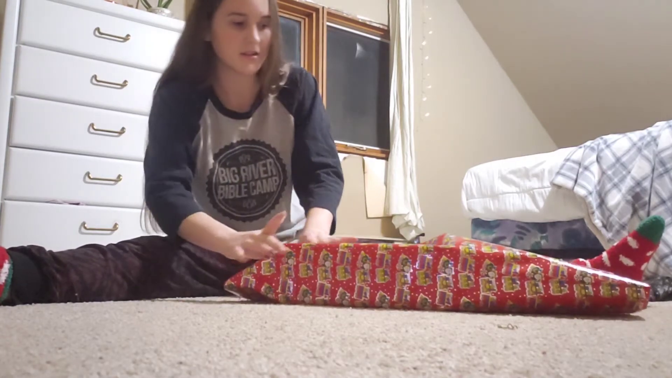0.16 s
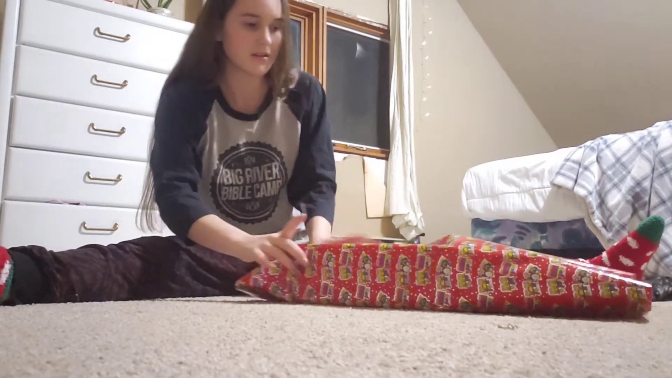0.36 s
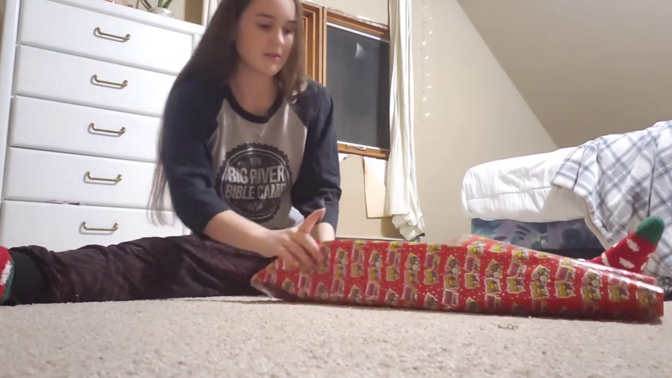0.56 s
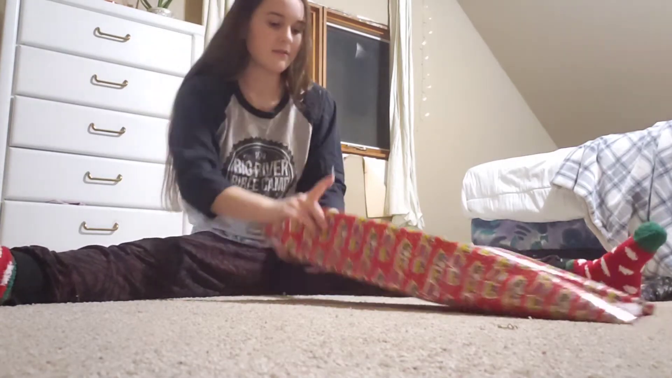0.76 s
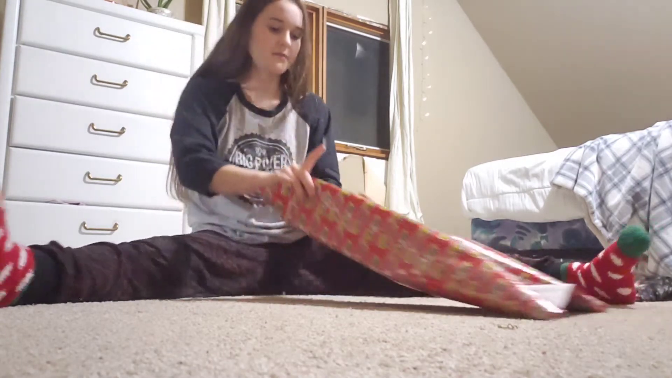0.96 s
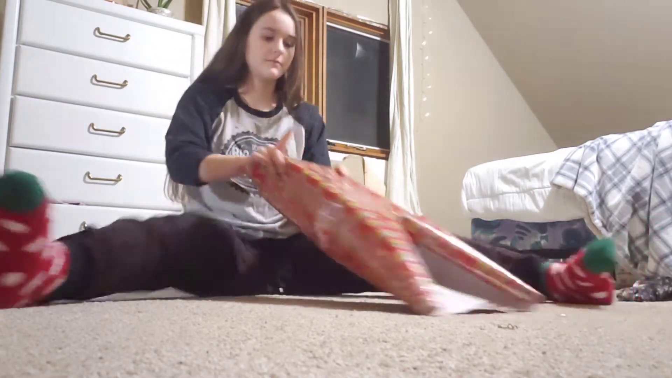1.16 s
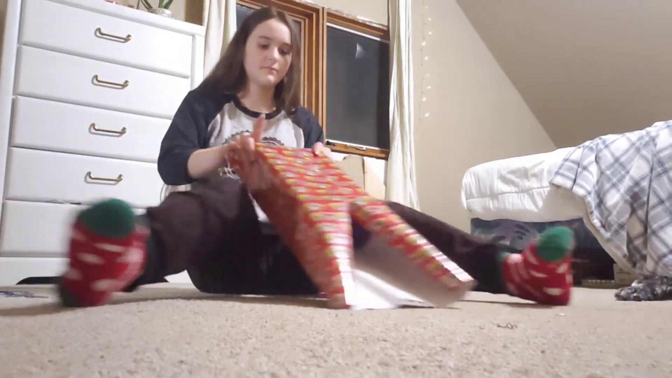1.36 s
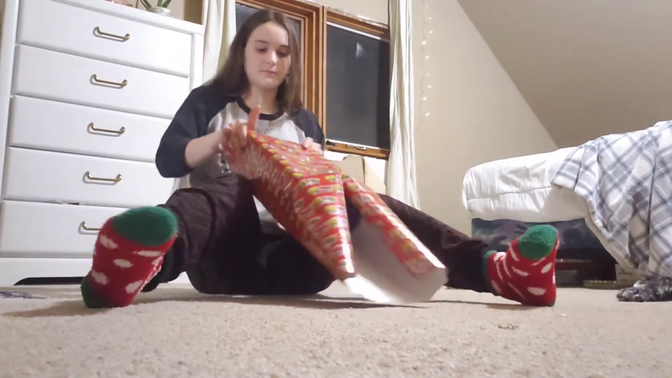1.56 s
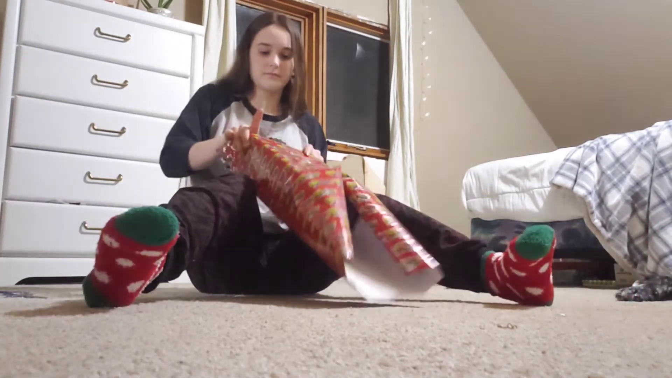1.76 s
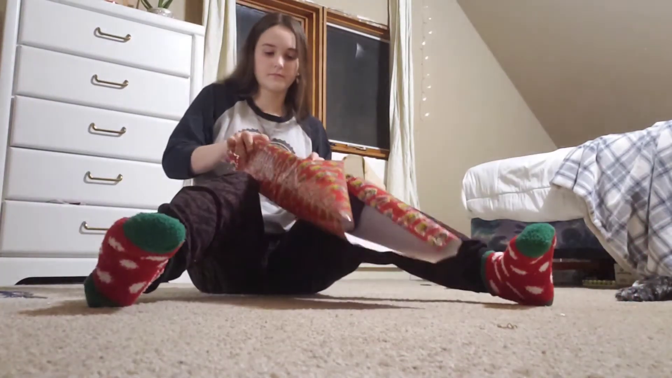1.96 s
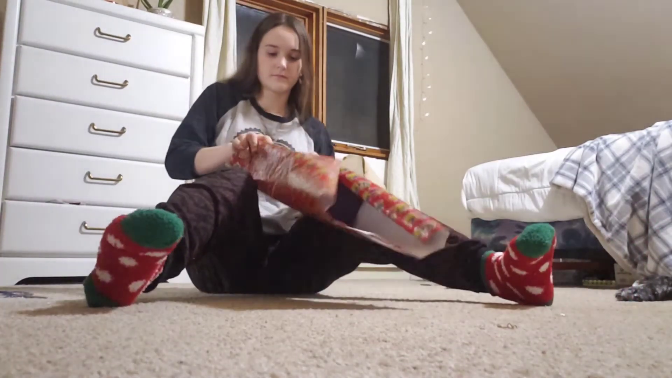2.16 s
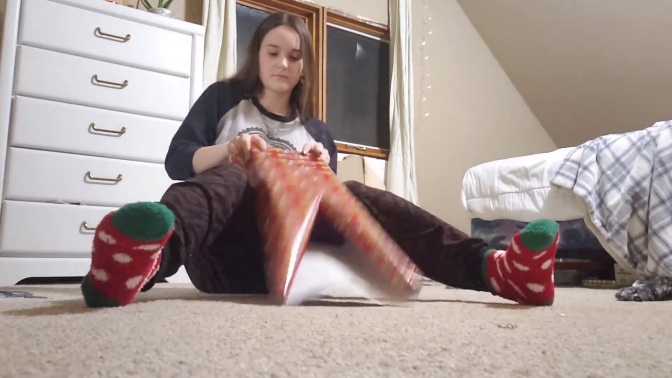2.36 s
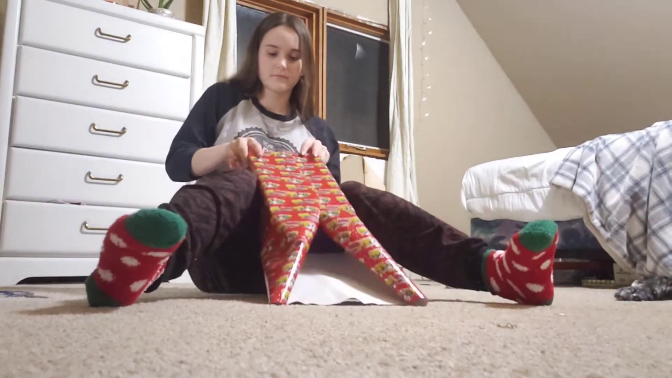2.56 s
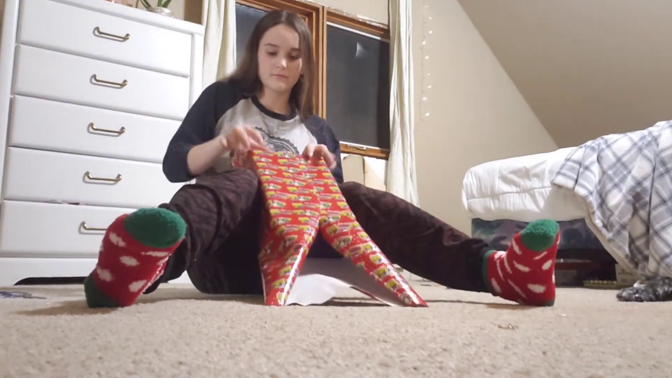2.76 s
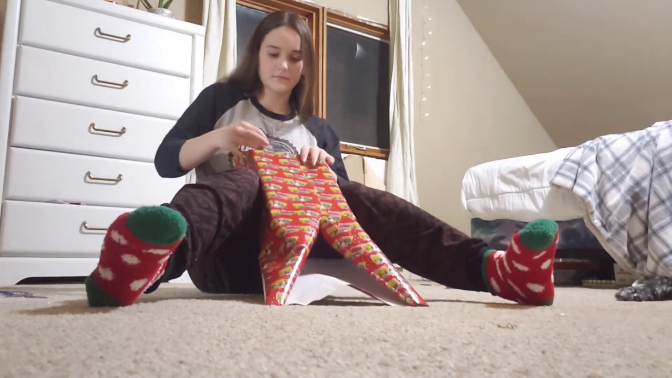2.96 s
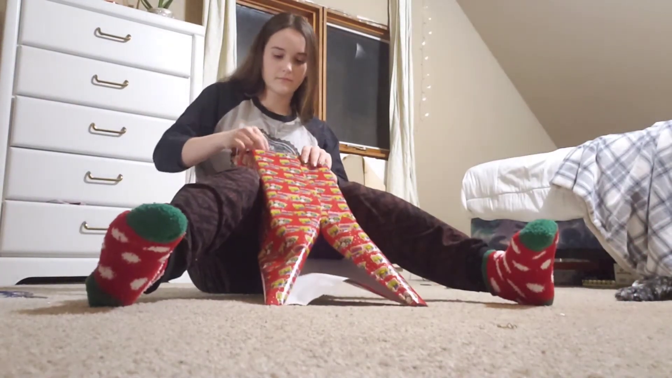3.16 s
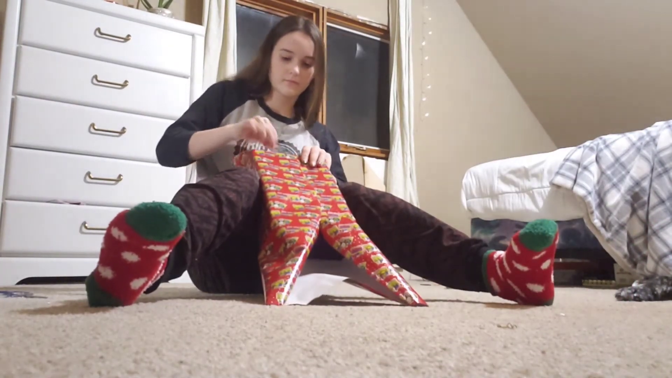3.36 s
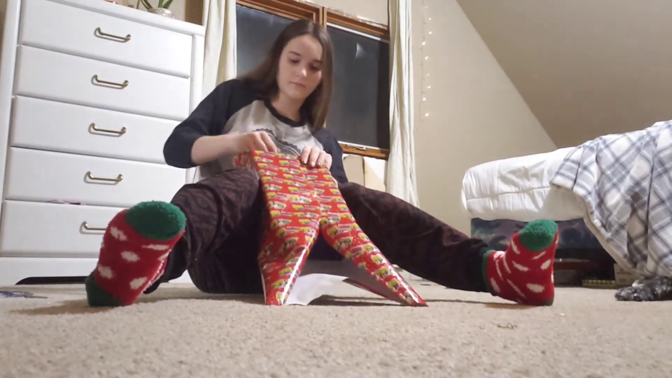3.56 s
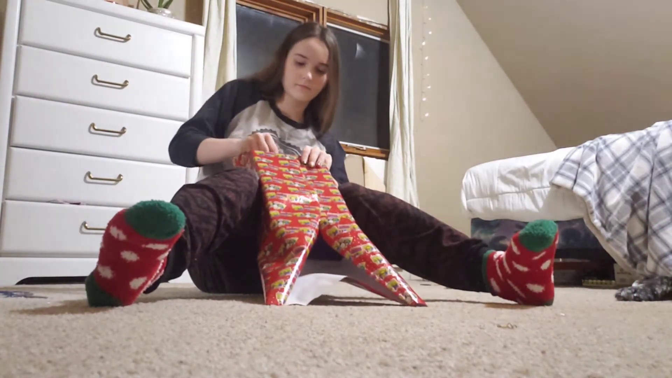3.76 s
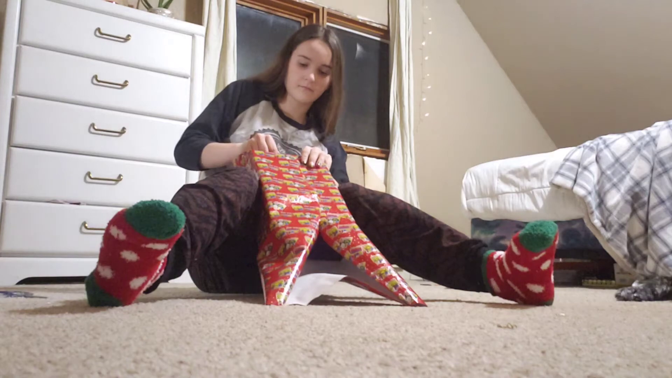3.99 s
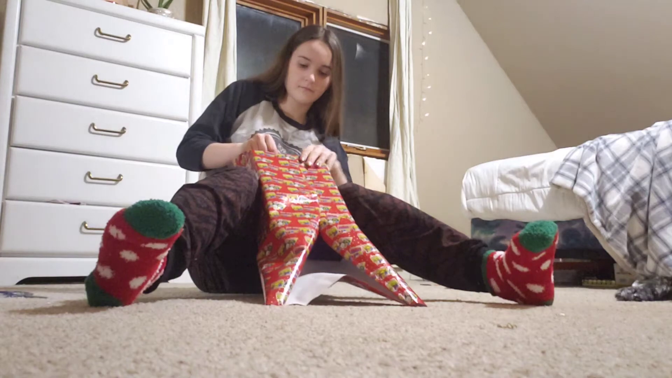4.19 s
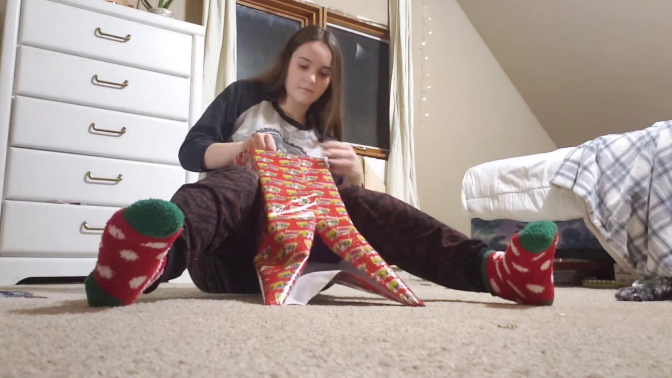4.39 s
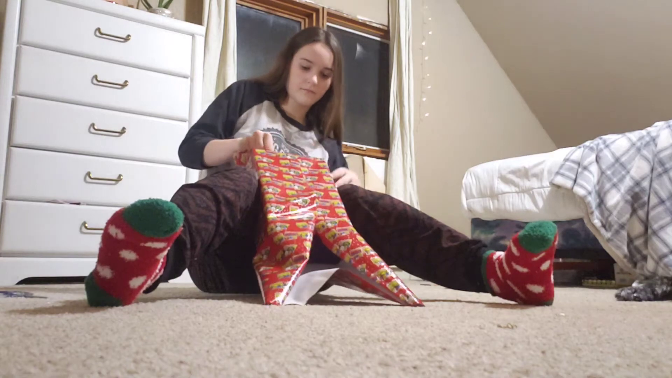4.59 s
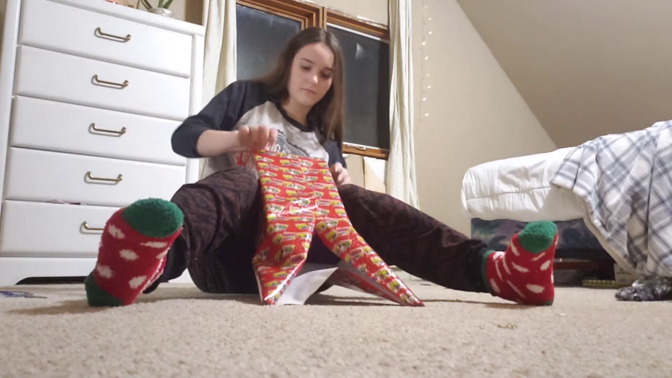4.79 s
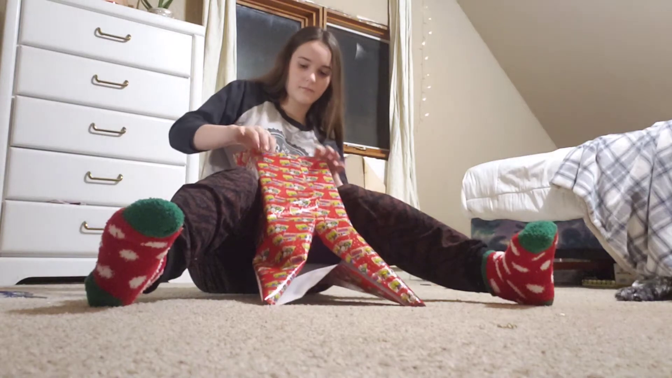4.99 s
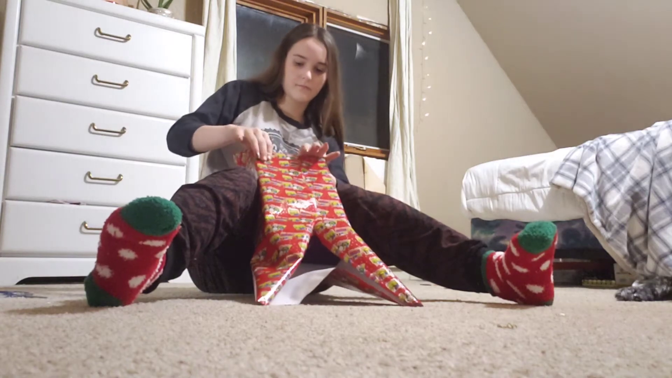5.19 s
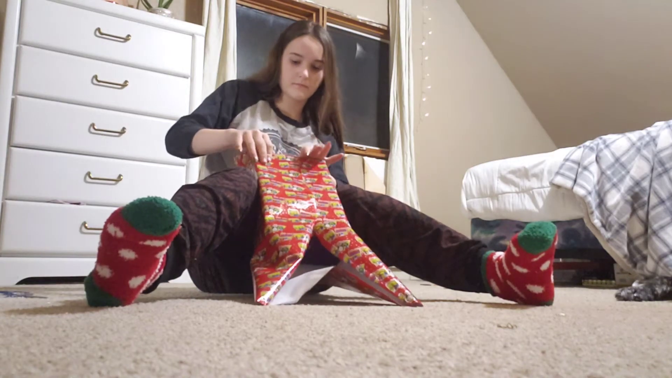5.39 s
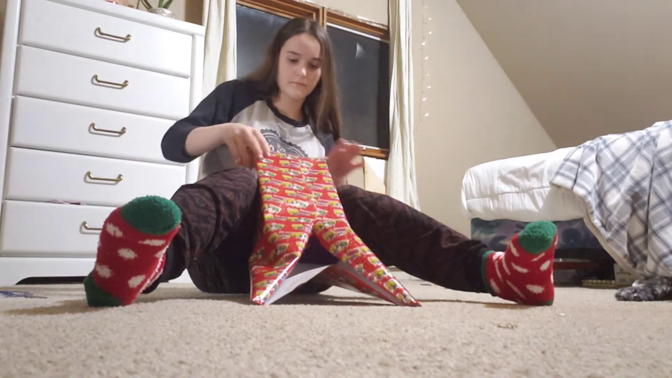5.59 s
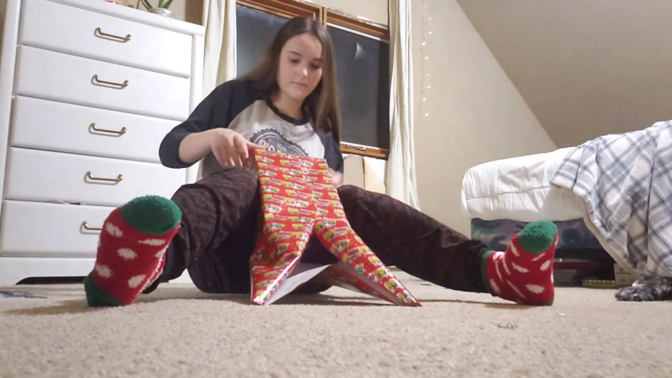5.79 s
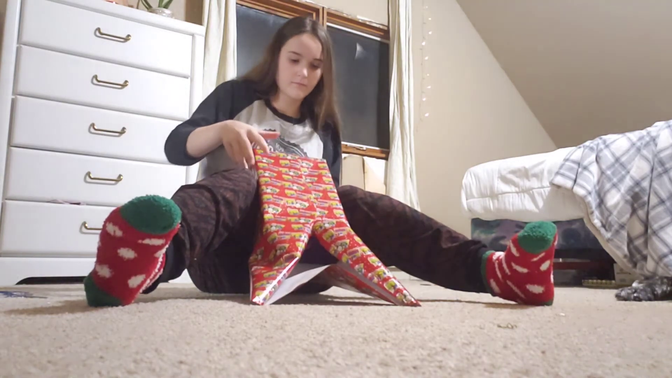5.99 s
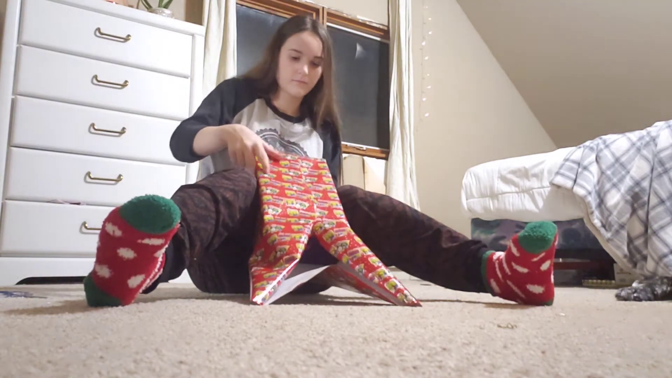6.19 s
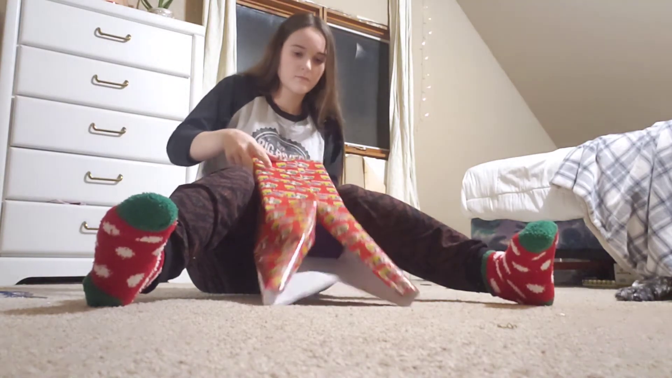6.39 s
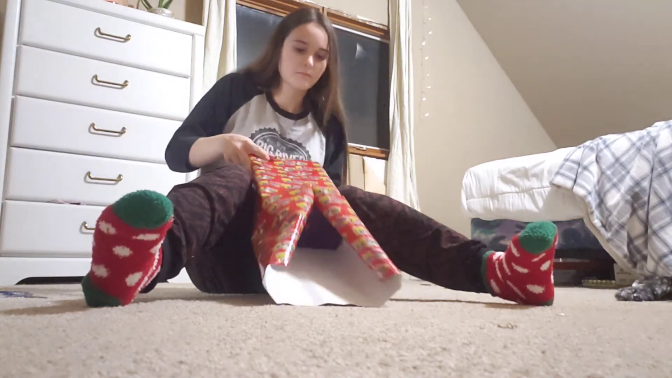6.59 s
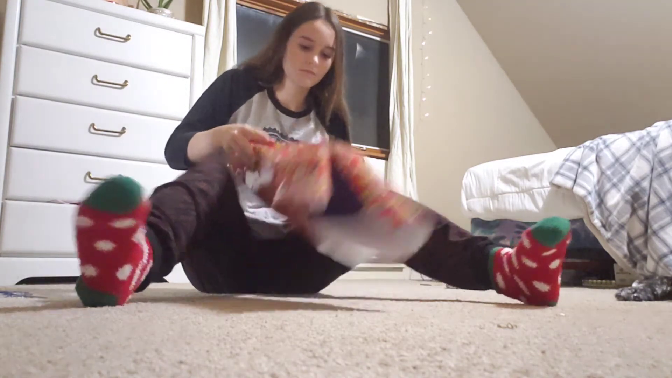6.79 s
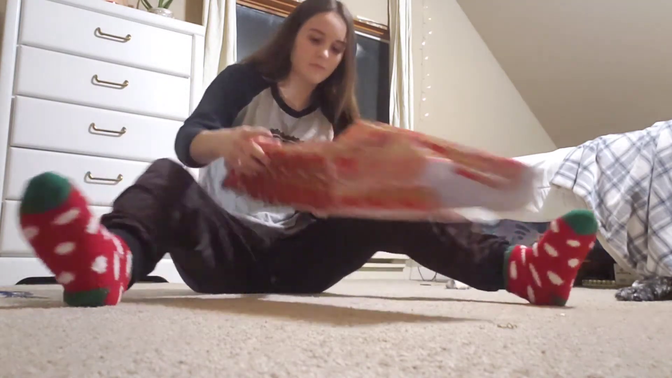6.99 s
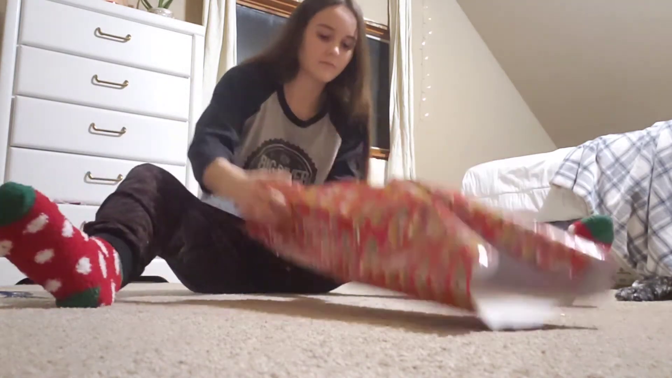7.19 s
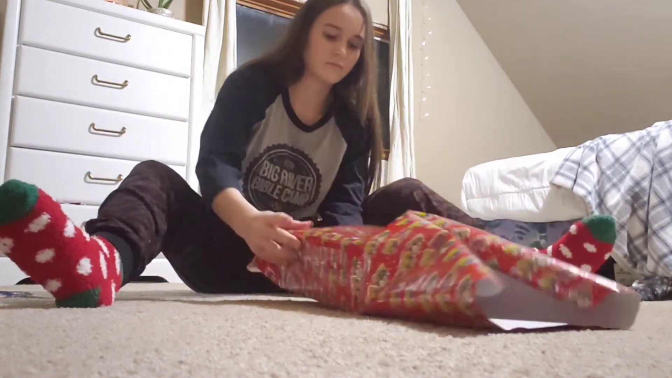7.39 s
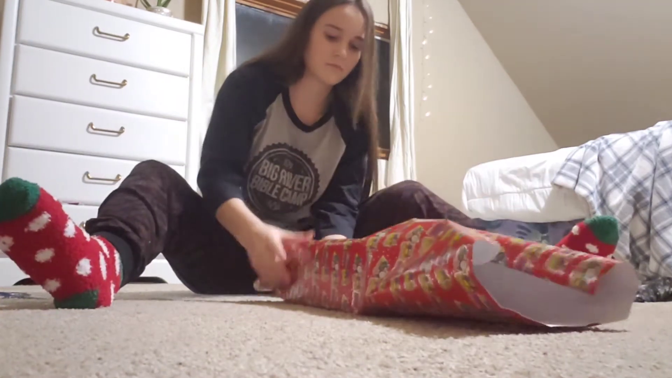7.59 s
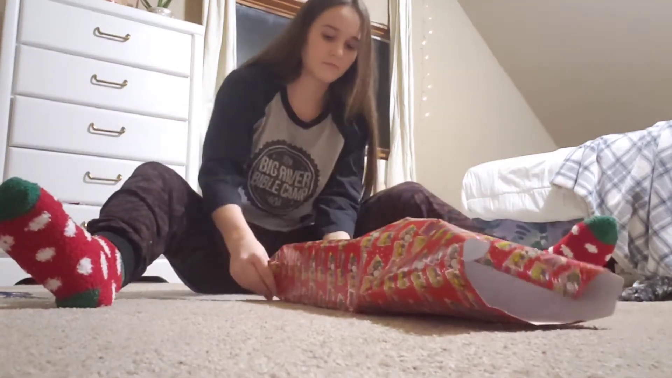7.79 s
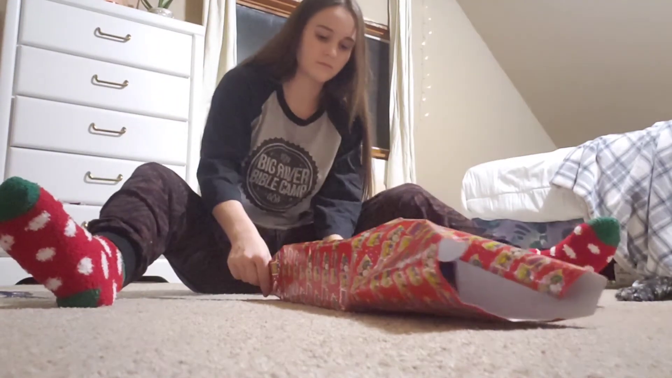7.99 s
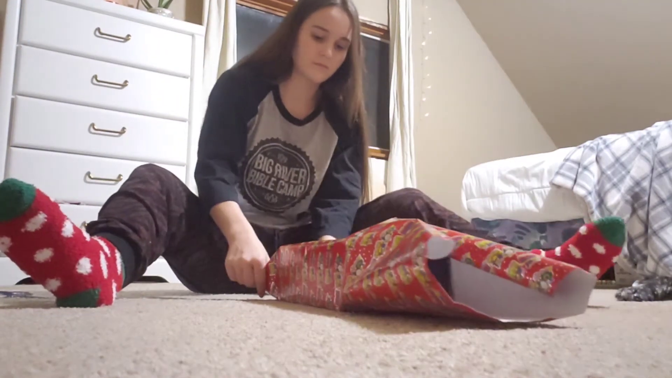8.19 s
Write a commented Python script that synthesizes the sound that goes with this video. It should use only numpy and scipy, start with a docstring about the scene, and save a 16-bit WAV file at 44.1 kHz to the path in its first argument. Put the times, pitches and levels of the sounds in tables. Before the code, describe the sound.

A small, softly furnished room, heard in close stereo with short echo and very faint air noise and hum. Paper slides lightly at first, with a snap around 0.4 s and a soft bump and flex at 0.5 s. Rustling thickens; a bright, hard crease cracks at about 1.15 s with a low cushioned knock. Until 2.6 s the sheet crackles busily, with dull hollow pops near 1.5 and 1.85 s and crisp snaps at 1.8 and 2.5 s. It thins to scattered creases around 3 s and almost stops after 3.5 s. Small ticks and brief soft rustles come between 4.3 and 5.7 s, then another near-silence. From 6.2 s movement returns, with a soft bump at 6.5 s, louder crumpling from 7 s and the heaviest low thump at 7.3 s. Papery pops and a sharp snap at 7.85 s follow, rustling to the end.

```python
"""A long box half covered in wrapping paper is lifted, folded at one end and laid back on a bedroom carpet.
From the start the paper slides and flexes: noise hiss and random clicks ringing through paper patches.
Single creases soon snap, soft low noise bumps mark box against legs and floor, then wide panels pop dully.
The handling thins out from about 3.5 s and grows strong again after 6 s, with the loudest bump near 7.3 s.
Air noise and mains hum lie under it all; two microphone ports hear the paper through a small room's echo."""
import sys
import numpy as np
from scipy import signal
from scipy.fft import rfft, irfft, next_fast_len
from scipy.io import wavfile
from scipy.ndimage import uniform_filter1d, map_coordinates

SR = 44100
rng = np.random.default_rng(int(sys.argv[2]) if len(sys.argv) > 2 else 0)


def store_wav(level_fs):
    """Save 16-bit WAV to argv[1]."""
    pcm = np.round(np.clip(np.atleast_2d(level_fs), -1, 1) * 32767)
    wavfile.write(sys.argv[1], SR, pcm.T.astype(np.int16))


N = 363825
T = np.arange(N) / SR
RING = T[:int(.3 * SR)]  # time axis of every single ring [s]
TOP_HZ = 16000  # band limit


def amp(db):
    """Decibels to gain."""
    return 10 ** (np.asarray(db) / 20)


def power_db(power):
    """Power to decibels."""
    return 10 * np.log10(power)


def unit(x):
    """x at rms 1."""
    return x / np.sqrt(np.mean(np.square(x)))


def along(points, hz, axis=1):
    """One column of (frequency [Hz], ..) points, read on a log frequency axis."""
    table = np.transpose(points)
    return np.interp(np.log(hz + 1), np.log(table[0]), table[axis])


def coloured(x, gain_db):
    """x through the causal minimum-phase filter whose gain is gain_db(Hz)."""
    size = 2 * next_fast_len(x.shape[-1] // 2 + 4096)
    log_gain = np.log(amp(gain_db(np.fft.rfftfreq(size, 1 / SR))))
    # folding the cepstrum onto positive time makes the filter causal
    cepstrum = irfft(log_gain)
    cepstrum[1:size // 2] *= 2
    cepstrum[size // 2 + 1:] = 0
    response = np.exp(rfft(cepstrum))
    return irfft(rfft(x, size) * response)[..., :x.shape[-1]]


def voiced(x, spectrum):
    """White x given a spectrum whose mean power up to TOP_HZ is 1."""
    power = np.mean(amp(along(spectrum, np.linspace(0, TOP_HZ, len(RING)))) ** 2)
    return coloured(x, lambda hz: along(spectrum, hz) - power_db(power))


# Faint air noise of the room: (frequency [Hz], relative level [dB])
AIR_SPECTRUM = [(124, 2), (3740, -20), (8640, -23), (15800, -12)]
HUM_HZ = 120


def quiet_room():
    """Faint air noise, independent in mid and side, over a steady sine of mains hum."""
    air = amp(-74.5) * voiced(rng.standard_normal((2, N)), AIR_SPECTRUM)
    hum = amp(-82.5) * np.sin(2 * np.pi * HUM_HZ * T)
    return air + hum


# Decay of the small room: (frequency [Hz], time to fall 60 dB [s])
ROOM_DECAY = [(4000, 0.23), (15000, 0.14)]
WALL_S, EARLY_DB = .024, -3.5  # nearby furniture answers first, more weakly; then the far walls


def room_tail():
    """A fresh mid/side reverberation of energy 1 that swells when the far walls answer."""
    hz, t, cells = signal.stft(rng.standard_normal((2, len(RING))), SR)
    decay = amp(-60 * t / along(ROOM_DECAY, hz)[:, None])
    tail = signal.istft(cells * decay, SR)[1][:, :len(RING)]
    swelling = np.where(RING < WALL_S, amp(EARLY_DB) * tail, tail)
    return unit(swelling) / np.sqrt(len(RING))


def patch(colour, t60, crack_db, room_db, ripple_db):
    """One patch of paper answers a click with a crack and a short ring at its own resonances; the room follows."""
    ringing = amp(-60 * RING / t60)
    crack = amp(crack_db - 60 * RING / .004)  # gone within milliseconds
    fade = (ringing + crack) * (1 - np.exp(-RING / .0003))
    ring = unit(rng.standard_normal((2, len(RING))) * fade) / np.sqrt(len(RING))
    heard = (ring + amp(room_db) * room_tail()) / np.sqrt(1 + amp(2 * room_db))
    # random ripple over the colour gives each patch its own resonances
    modes_hz = np.geomspace(30, TOP_HZ, num=110)
    modes_db = colour(modes_hz) + ripple_db * rng.standard_normal(len(modes_hz))
    return voiced(heard, np.column_stack([modes_hz, modes_db]))


def crumple(level_db, spectrum, rate, scatter_db, t60, room_db, ripple_db, growth=.24, count=170):
    """Random buckles, denser as well as louder under effort, that wander from patch to patch."""
    busy = rate * amp(growth * (level_db - level_db.max()))  # clicks per second
    clicks = (rng.random(N) < busy / SR) * amp(scatter_db * rng.standard_normal(N))
    # the hands feed in energy steadily; the buckles share it out unevenly
    power = np.abs(uniform_filter1d(uniform_filter1d(clicks ** 2, size=2200), size=900))
    clicks = clicks / np.sqrt(power + 1e-9) * amp(level_db)
    # neighbouring patches overlap in time
    place = np.floor(np.arange(N) * (count - 2) / N + 2 * rng.random(N))
    out = np.zeros((2, N + SR))
    for k in range(count):
        first, last = np.flatnonzero(place == k)[[0, -1]]
        ring = patch(lambda hz: along(spectrum, hz), t60, crack_db=3, room_db=room_db, ripple_db=ripple_db)
        own_clicks = clicks[first:last] * (place[first:last] == k)
        heard = signal.fftconvolve(own_clicks[None], ring, axes=1)
        out[:, first:first + heard.shape[1]] += heard
    return out[:, :N]


def stroke(start, end, rise, fall):
    """Power of one movement: full from start to end, with flanks in dB per second."""
    outside_db = rise * np.maximum(start - T, 0) + fall * np.maximum(T - end, 0)
    return amp(-2 * np.minimum(outside_db, 100))


def strokes_power(start, end, db, crisp_db, rise, fall):
    """One movement shared out as power of (broad bending, fine creasing)."""
    return amp([[db], [db + crisp_db]]) ** 2 * stroke(start, end, rise, fall)


# Paper sliding and shifting on box, legs and carpet:
# (start [s], end [s], broad bending level [dB], crispness: fine creasing against bending [dB])
PAPER_SLIDES = [(0, 0.142, -59, -4.5), (0.128, 0.434, -57, 3), (0.459, 1.276, -50, -1.5),
                (1.34, 1.709, -47, 1.5), (1.847, 2.125, -50.5, -3.5), (2.247, 2.62, -50.5, -4.5),
                (2.634, 3.336, -58.5, -9.5), (3.494, 3.642, -77, -1), (3.73, 3.882, -81, 1),
                (4.1, 4.273, -74, 2.5), (4.274, 4.816, -59.5, -3.5), (4.814, 4.928, -66.5, -11),
                (4.967, 4.975, -72, 13.5), (5.101, 5.195, -52, -3), (5.217, 5.33, -76, 8),
                (5.362, 5.672, -57, -3.5), (6.201, 7.016, -54.5, -6.5), (7.015, 8.007, -50, -3.5)]
SLIDE_RISE_DB_PER_S, SLIDE_STOP_DB_PER_S = 521.5, 366
CATCH_DB, CATCHES_PER_S = 1, 18  # sliding paper catches and lets go
# Hands bending the sheet and letting it relax:
# (time at full strength [s], hold [s], broad bending level [dB], crispness as above [dB])
HAND_FLEXES = [(0.14, 0.014, -48.5, -12), (0.508, 0.0042, -36.5, -13), (0.756, 0.037, -38.5, -9),
               (1.147, 0.014, -36, -3.5), (1.226, 0.0022, -37.5, -7.5), (1.47, 0.044, -34.5, -16.5),
               (1.542, 0.11, -41.5, -20.5), (1.754, 0.029, -37, -13), (2.088, 0.0051, -46, 1),
               (2.446, 0.035, -36.5, 0.5), (2.697, 0.105, -46.5, -6), (2.921, 0.044, -54, 4.5),
               (3.012, 0.01, -45.5, -6.5), (3.129, 0.02, -47.5, -2), (3.18, 0.02, -43, -6),
               (3.73, 0.031, -67, -8), (4.07, 0.061, -69, -2), (4.287, 0.11, -60.5, 3),
               (4.443, 0.1, -59, 3), (4.66, 0.017, -59.5, 9), (4.73, 0.013, -48.5, -2.5),
               (5.375, 0.075, -51.5, -2), (5.593, 0.044, -56.5, -2), (6.129, 0.11, -59.5, -22.5),
               (6.237, 0.0138, -56, 5), (6.354, 0.079, -48, 1), (6.433, 0.01, -42, -4),
               (6.508, 0.052, -41.5, -21), (6.664, 0.11, -44, -5), (7.066, .055, -43.5, -19),
               (7.148, 0.0137, -41.5, -6.5), (7.329, 0.011, -30, -9), (7.511, 0.015, -42, -1.5),
               (7.626, 0.067, -41.5, -2.5), (7.771, 0.087, -41.5, 1), (8.162, 0.085, -48.5, 0.5)]
FLEX_RISE_DB_PER_S, FLEX_RELAX_DB_PER_S = 654, 192


def handling():
    """Power of the flexes and of the slides, each as (broad bending, fine creasing)."""
    knots = rng.standard_normal(int(CATCHES_PER_S * T[-1]) + 4)
    catching = amp(2 * CATCH_DB * map_coordinates(knots, [T * CATCHES_PER_S]))
    sliding = sum(strokes_power(start, end, db, crisp_db, SLIDE_RISE_DB_PER_S, SLIDE_STOP_DB_PER_S)
                  for start, end, db, crisp_db in PAPER_SLIDES)
    flexing = sum(strokes_power(s, s + hold_s, db, crisp_db, FLEX_RISE_DB_PER_S, FLEX_RELAX_DB_PER_S)
                  for s, hold_s, db, crisp_db in HAND_FLEXES)
    return flexing, sliding * catching


# Bending sheet: (frequency [Hz], relative level [dB])
BENDING_SPECTRUM = [(30, -31), (70, -7.5), (160, -2.5), (350, -3), (460, 3.5), (600, -2), (800, -4),
                    (1300, -12.5), (2000, -16), (8000, -41.5)]
# Fine creases and sliding hiss: (frequency [Hz], relative level [dB])
CREASE_SPECTRUM = [(300, -5.5), (1000, 12.5), (1800, 4), (3000, 7.5), (5500, 5.5), (8200, -0.5),
                   (10500, 0.5), (12700, 7.5), (15800, 7.5)]
# Reach of dullness in a flipping flap: (frequency [Hz], share of the dullness [0-1])
FLAP_SHARE = [(1200, 1), (3500, .6), (7000, .35), (12000, 0)]
CRACKLE_DULL_DB = 4  # creases that flip have more body than paper that slides
# gains on the fine creasing: flexes mostly crackle (at 0 dB), slides crackle and hiss alike
SLIDE_CRACKLE_DB, SLIDE_HISS_DB, FLEX_HISS_DB = -5, -5, -6


def sheet():
    """Wide areas buckle dully, fine creases crackle, and moving paper hisses."""
    (flex_broad, flex_fine), (slide_broad, slide_fine) = handling()
    bend_db = power_db(flex_broad + slide_broad)
    crease_db = power_db(flex_fine + amp(SLIDE_CRACKLE_DB) ** 2 * slide_fine)
    hiss_db = power_db(amp(FLEX_HISS_DB) ** 2 * flex_fine + amp(SLIDE_HISS_DB) ** 2 * slide_fine)
    buckling = crumple(bend_db, BENDING_SPECTRUM, rate=600, scatter_db=3.5, t60=.029, room_db=-10, ripple_db=2.5)
    folds = [(hz, db + CRACKLE_DULL_DB * along(FLAP_SHARE, hz)) for hz, db in CREASE_SPECTRUM]
    crackle = crumple(crease_db, folds, rate=480, scatter_db=6.5, t60=.022, room_db=-5, ripple_db=3.6)
    hiss = voiced(amp(hiss_db) * rng.standard_normal((2, N)), CREASE_SPECTRUM)
    return buckling + crackle + hiss


def add_flip(out, s, db, ring):
    """One flip of the paper added to out: any few random warning ticks, then the full ring."""
    before = T[:SR // 80][::-1]  # time left until the flip [s]
    ticks = (rng.random(len(before)) < 900 / SR) * amp(-20) * np.exp(-before / .005)
    ticks[-1] = 1
    levelled = ring / np.sqrt(np.mean(ring[:, :SR // 200] ** 2))  # first 5 ms at rms 1
    flip = signal.fftconvolve(ticks[None], levelled, axes=1)
    start = round(s * SR) - len(before)
    out[:, start:start + flip.shape[1]] += amp(db) * flip


# Creases that snap through: (time [s], level of the ring's first 5 ms [dB], dullness [dB])
CREASE_SNAPS = [(0.2472, -43, 5.5), (0.4296, -34.5, -1.5), (0.5478, -34.5, -19.5), (0.6162, -42.5, 3),
                (0.9792, -36, -5), (1.0364, -40, 9.5), (1.1587, -27.5, 0), (1.1613, -20, -7.5),
                (1.4303, -45.5, 7.5), (1.5942, -35, 0.5), (1.6023, -29.5, 2.5), (1.7662, -38, 7.5),
                (1.8054, -25, -2), (2.0263, -41, 3.5), (2.1148, -28, -19), (2.4513, -27, 4),
                (2.475, -36.5, 11), (2.5136, -30.5, 14), (2.526, -39, 12), (2.7872, -34.5, 4),
                (2.8825, -35.5, -2), (3.0213, -38.5, -10), (3.1933, -28, -14), (3.251, -36, 2.5),
                (3.459, -38, -26.5), (4.0473, -61.5, -6.5), (4.3305, -48, -0.5), (4.5114, -43, 8),
                (4.657, -46, 3), (4.7424, -40.5, -2), (4.9384, -56, -5.5), (5.079, -51.5, 1),
                (5.3241, -58, -13.5), (5.3584, -53, 3.5), (5.5952, -40, -11.5), (6.3618, -41.5, 8),
                (6.435, -39.5, -4), (6.6727, -37.5, 3), (6.907, -46.5, 24), (7.0294, -43.5, -1),
                (7.134, -30.5, -0.5), (7.2233, -36.5, 4), (7.4306, -36.5, -10), (7.5225, -36, 2),
                (7.541, -36, 8.5), (7.7857, -34, 2), (7.8414, -30, -14.5), (7.8457, -23.5, -5),
                (7.947, -41.5, 1), (8.1037, -32.5, -2.5), (8.1682, -43.5, -4.5), (8.178, -40, -6)]
# A sharp snap: (frequency [Hz], relative level [dB])
SNAP_SPECTRUM = [(150, -3.5), (500, 8), (1700, 4.5), (3500, -1.5), (6000, 2.5), (8500, -6.5), (13000, 1),
                 (15800, 5.5)]


def snaps():
    """Single creases flip over, the duller the larger the flap."""
    out = np.zeros((2, N + SR))
    for s, db, dull_db in CREASE_SNAPS:
        colour = lambda hz: along(SNAP_SPECTRUM, hz) + dull_db * along(FLAP_SHARE, hz)
        add_flip(out, s, db, patch(colour, t60=.024, crack_db=2, room_db=-4, ripple_db=4.2))
    return out[:, :N]


# Soft bumps of the box and the air it pushes:
# (time [s], peak level [dB], centre frequency [Hz], time to fall 60 dB [s])
BOX_BUMPS = [(0.507, -40, 169, 0.13), (1.157, -35.5, 236, 0.1), (1.236, -46.5, 73, 0.91),
             (3.457, -54, 180, 0.14), (4.42, -49.5, 180, 0.22), (6.518, -32.5, 204, 0.14),
             (7.329, -28, 189, 0.17), (7.329, -31.5, 58, 0.3)]


def bumps(rise_s=0.0013, skirt_db=12):
    """The hollow box meets cloth and carpet: a soft push into a broad low resonance."""
    out = np.zeros((2, N + SR))
    for s, db, centre_hz, t60 in BOX_BUMPS:
        swell = amp(-60 * RING / t60) * (1 - np.exp(-RING / rise_s))
        push = rng.standard_normal((2, len(RING))) * swell
        # skirts steepen with the square of the distance in octaves
        boom = coloured(push, lambda hz: -skirt_db * np.minimum(np.log2((hz + 1) / centre_hz) ** 2, 6))
        start = round(s * SR)
        out[:, start:start + len(RING)] += amp(db) * boom / np.abs(boom).max(axis=1, keepdims=True)
    return out[:, :N]


# Wide panels that buckle with a hollow note:
# (time [s], level of the ring's first 5 ms [dB], resonance [Hz])
PANEL_POPS = [(1.4901, -32.5, 630), (1.8454, -29, 630), (1.9264, -35, 593), (2.245, -45, 840),
              (2.71, -42.5, 645), (3.19, -39, 511), (5.074, -51.5, 546), (5.862, -68.5, 513),
              (6.045, -62.5, 600), (6.105, -62, 500), (7.6299, -37.5, 726), (7.7231, -31.5, 663),
              (7.735, -35, 1550), (7.886, -42.5, 1430), (7.978, -39.5, 1410)]
POP_SKIRT_DB_PER_OCTAVE = 10.5


def pops():
    """Wide panels buckle, each ringing briefly around one resonance."""
    out = np.zeros((2, N + SR))
    for s, db, centre_hz in PANEL_POPS:
        colour = lambda hz: -POP_SKIRT_DB_PER_OCTAVE * np.abs(np.log2(hz / centre_hz))
        add_flip(out, s, db, patch(colour, t60=.024, crack_db=0, room_db=-11, ripple_db=2))
    return out[:, :N]


# The two microphone ports: (frequency [Hz], side gain against mid [dB], left against right [dB])
PORT_BALANCE = [(96, -17, -2.5), (330, -8.5, 1.5), (792, -1, -5.5), (1530, -2.5, 6.5), (7160, 1, 4),
                (8300, -2, -8), (15440, 0, -6)]


def scene():
    """Paper, box and room at two ports: alike in the bass, shaded differently by the body that holds them."""
    mid, side = quiet_room() + sheet() + snaps() + bumps() + pops()
    side = coloured(side, lambda hz: along(PORT_BALANCE, hz))
    shade = lambda hz: along(PORT_BALANCE, hz, axis=2) / 2
    left = coloured(mid + side, shade)
    right = coloured(mid - side, lambda hz: -shade(hz))
    return np.array([left, right])


def record(dry):
    """A high-pass thins the deepest rumble and a brick wall removes everything from TOP_HZ up."""
    thinned = signal.sosfilt(signal.butter(4, 32, "highpass", fs=SR, output="sos"), dry)
    size = next_fast_len(N + SR)
    in_band = np.fft.rfftfreq(size, 1 / SR) < TOP_HZ
    return irfft(rfft(thinned, size) * in_band, size)[:, :N]


dry = scene()
out = record(dry)
store_wav(out)
```